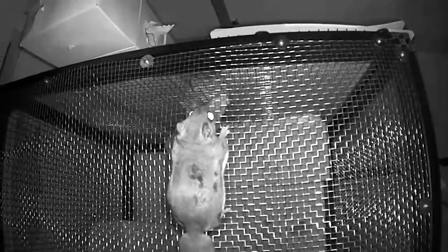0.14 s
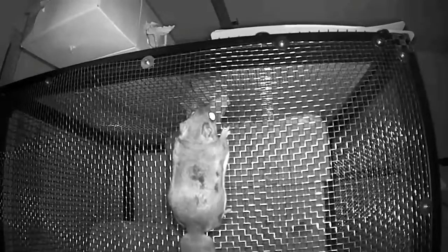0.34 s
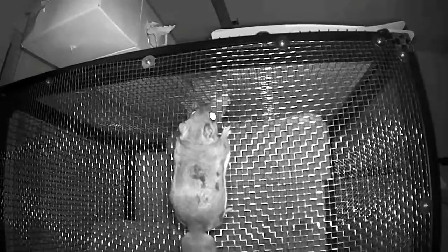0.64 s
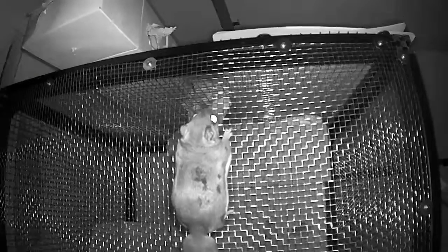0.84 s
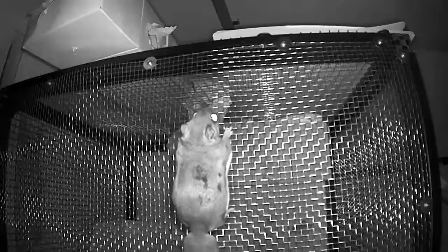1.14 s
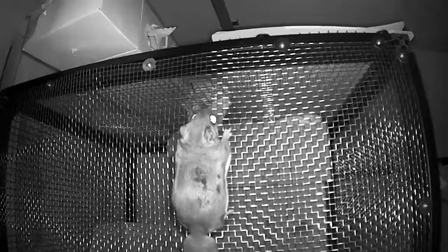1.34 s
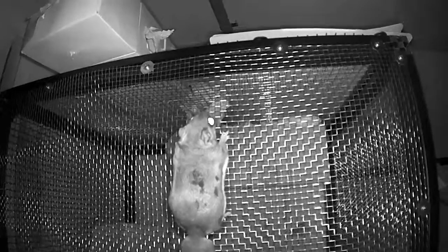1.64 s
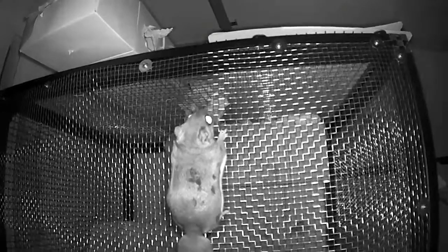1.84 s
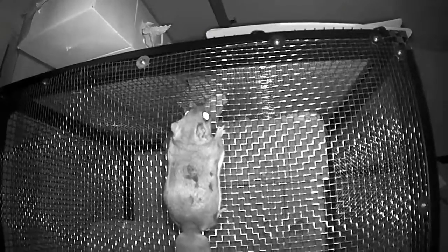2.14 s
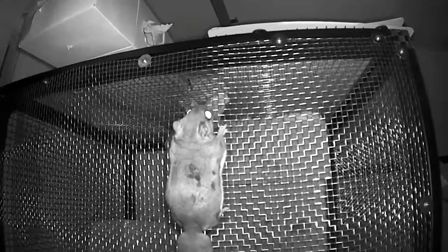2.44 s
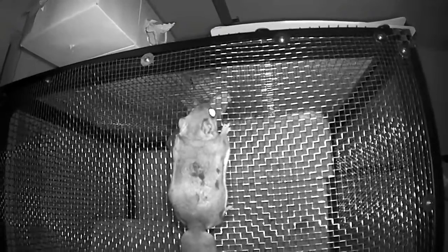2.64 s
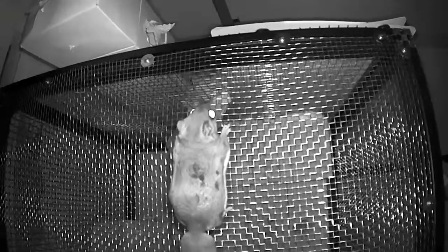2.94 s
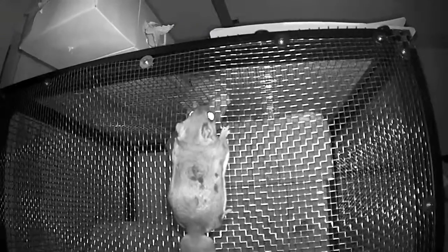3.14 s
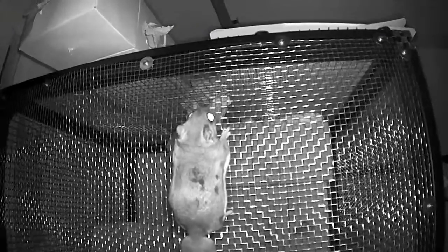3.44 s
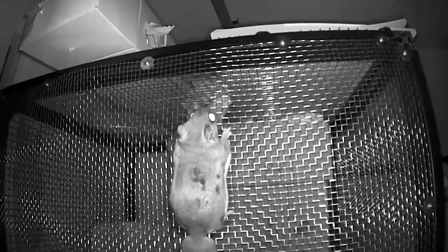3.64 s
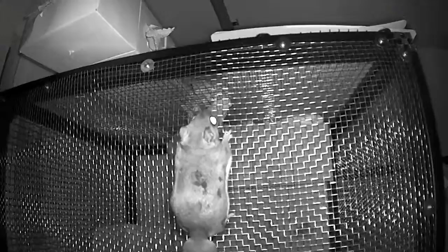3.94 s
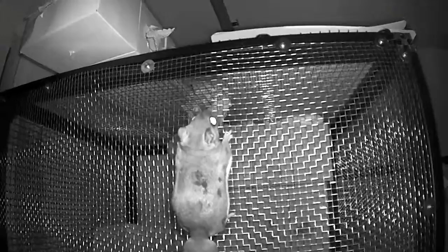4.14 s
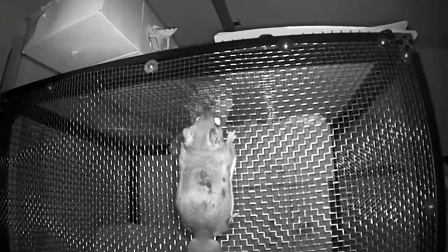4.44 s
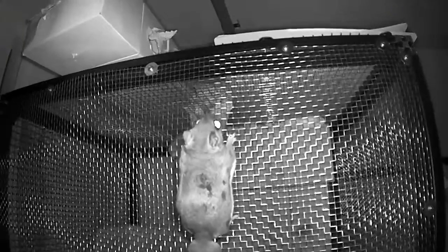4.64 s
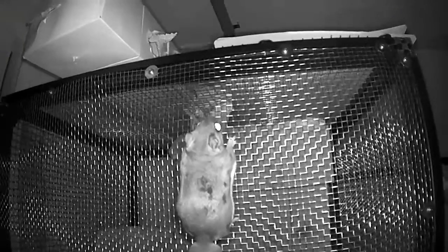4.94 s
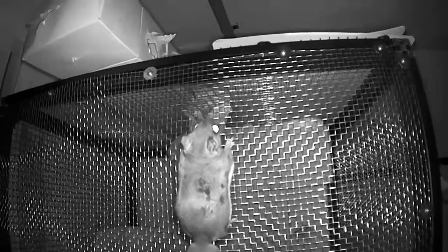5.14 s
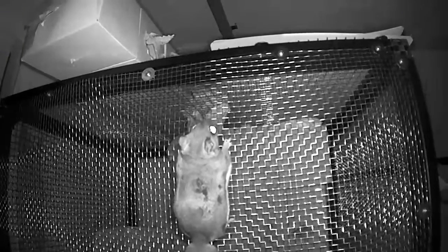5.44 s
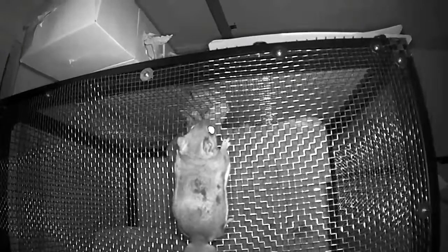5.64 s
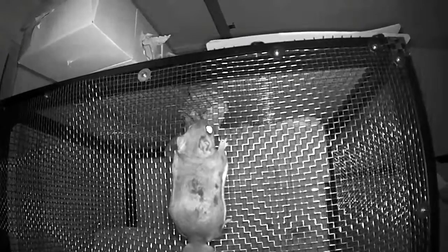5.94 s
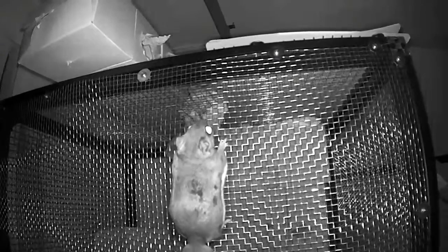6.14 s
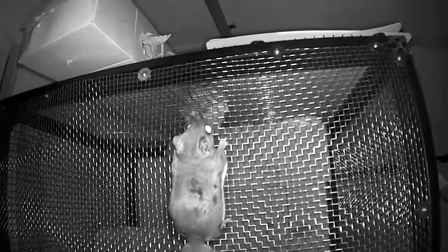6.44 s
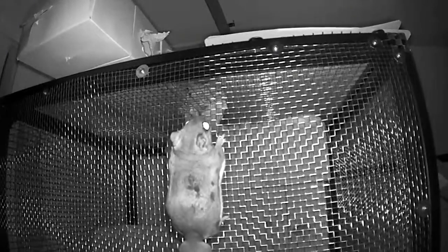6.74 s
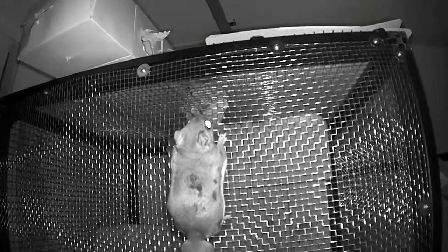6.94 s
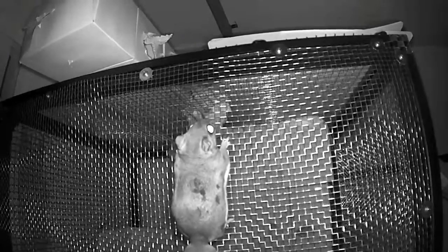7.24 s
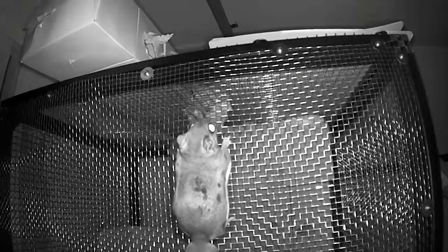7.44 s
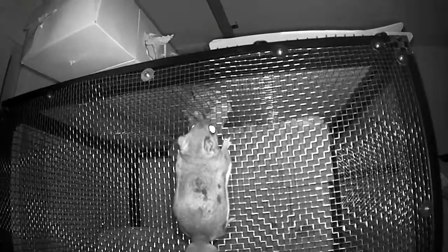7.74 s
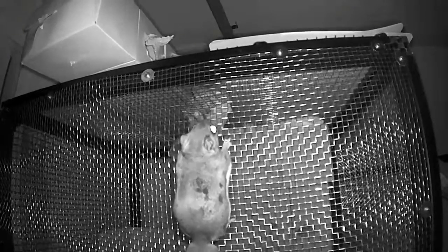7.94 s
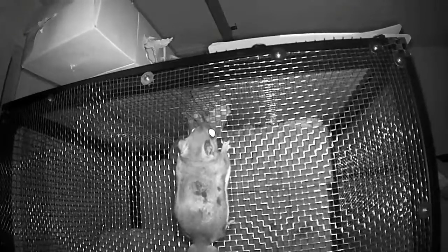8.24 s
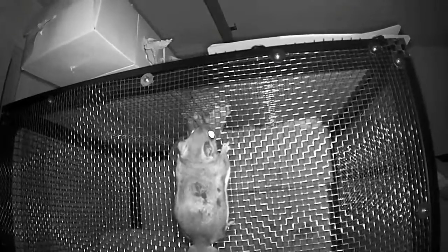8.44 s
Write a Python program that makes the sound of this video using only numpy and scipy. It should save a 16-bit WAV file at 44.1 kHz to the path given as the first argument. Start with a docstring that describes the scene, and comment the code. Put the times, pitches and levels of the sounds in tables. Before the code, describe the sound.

Eight piercing chirps from a caged squirrel, unevenly spaced around a second apart, each prepared by soft hiss and rasp and ending in a fast downward swoop with a brief room echo. Distant, blurred chirps answer faintly. Underneath lie low room rumble, airy noise, a thin whine and the camera's quiet stuttering buzz. Soft low thumps stir the cage twice. The microphone is close, the sound narrow and identical in both channels.

```python
"""Flying squirrel calling at night

A flying squirrel calls from a mesh cage in a quiet room, close to a small night camera. Each call is shaped
noise (a thin hiss), random grains and a sagging tone (a raspy wheeze), then a loud gliding sine: a whistle
that hangs near 8 kHz and plunges nearly two octaves. Faint calls of the same kind come from further off.
The camera's gated partials buzz once per frame, and damped sines make two soft disturbances of the cage."""
import sys
import numpy as np
from scipy import signal
from scipy.fft import rfft, irfft
from scipy.io import wavfile

SR = 44100
rng = np.random.default_rng(int(sys.argv[2]) if len(sys.argv) > 2 else 0)


def output_pcm(signal):
    """Save a mono or channel-first signal as 16-bit PCM at the path in sys.argv[1].

    Samples are clipped to [-1, 1] before scaling.
    """
    pcm = np.clip(np.atleast_2d(signal).T, -1, 1) * 32767
    wavfile.write(sys.argv[1], SR, np.round(pcm).astype(np.int16))


N = 378378
TIME = np.arange(N) / SR


def from_db(db):
    """Logarithmic level: decibels to amplitude gain."""
    return 10 ** (np.asarray(db) / 20)


def rms_one(x):
    """Normalization: scale to unit rms."""
    return x / np.sqrt(np.mean(x ** 2) + 1e-20)


def coloured(x, spectrum):
    """Spectral filtering: shape x by (pitch_hz, level_db) points on a log-frequency axis; unit rms."""
    hz, db = np.transpose(spectrum)
    bins_hz = np.fft.rfftfreq(len(x), 1 / SR) + 1  # the offset avoids log(0)
    gain = from_db(np.interp(np.log(bins_hz), np.log(hz), db))
    return rms_one(irfft(rfft(x) * gain, len(x)))


def noise(spectrum):
    """Stationary random noise: steady, with a given colour."""
    return coloured(rng.standard_normal(N), spectrum)


def drift(rate_hz):
    """Low-passed randomness: a smooth random curve of unit rms."""
    r = np.exp(-2 * np.pi * rate_hz / SR)
    return rms_one(signal.lfilter([1], [1, -2 * r, r * r], rng.standard_normal(N)))


def sine(hz):
    """Phase integration: a tone of unit rms follows a pitch curve."""
    return np.sqrt(2) * np.sin(2 * np.pi * np.cumsum(hz) / SR)


def envelope(s, attack, hold, release):
    """Exponential growth and decay: 20 dB per attack or release time; gives (span, time from s, dB)."""
    span = slice(*np.searchsorted(TIME, [s - 2 * attack, s + hold + 2 * release]))
    t = TIME[span] - s
    return span, t, -20 * np.maximum(np.maximum(-t / attack, (t - hold) / release), 0)


def puffs(events, attack, release):
    """Amplitude modulation: the gain of a row of (start_s, hold_s, level_db) puffs."""
    gain = np.zeros(N)
    for s, hold, db in events:
        span, t, fade = envelope(s, attack, hold, release)
        gain[span] += from_db(db + fade)
    return gain


# colour of the low room rumble: pitch_hz, level_db (relative)
RUMBLE_COLOUR = [(12, -8.5), (20, 2.5), (38, 0.5), (97, -12.5), (189, -19.5), (375, -24), (464, -26),
                 (600, -30), (780, -58), (1320, -120)]
# colour of the airy room noise: pitch_hz, level_db (relative)
AIR_COLOUR = [(300, -3), (600, -4), (1100, -2), (1900, 0.5), (2400, 4), (3000, -1), (4300, -2), (5500, -2),
              (6800, -1.5), (7600, 0.5), (8100, -6.5)]


def room_floor(rumble_db=-60, air_db=-65):
    """Incoherent superposition: low rumble and airy noise add in power."""
    return from_db(rumble_db) * noise(RUMBLE_COLOUR) + from_db(air_db) * noise(AIR_COLOUR)


# longer spells of camera buzz: centre_s, length_s, level_db
LONG_BUZZES = [(.885, 0.039, -57), (2.87, 0.053, -56.5), (4.87, 0.041, -56), (6.895, 0.034, -56)]
# inharmonic partials of the buzz: multiple of the base pitch, level_db, roughness (0-1)
BUZZ_PARTIALS = [(1, 0, 0.3), (1.76, -19, 0.3), (2.32, -26.5, 0.7), (2.8, -15, 0.5), (3.02, -11.5, 0.4),
                 (4.218, -17.5, 0.5)]
FRAME_RATE_HZ, FIRST_FRAME_S = 15.014, .0537


def camera(buzz_hz=818, buzz_db=-55, whine_hz=2462, whine_db=-76, scatter_s=0.0012):
    """Gated partials: the electronics buzz at every frame, a little differently each time, over a thin whine."""
    length_s, edge_s, wander = .013, .005, .03  # typical burst length, edge ramp, pitch spread as a fraction
    frames = np.arange(FIRST_FRAME_S, TIME[-1], 1 / FRAME_RATE_HZ)
    chance = rng.uniform(-1.2, 1, (len(frames), 3))
    bursts = [(s + scatter_s * a, length_s * (1 + 0.39 * b), buzz_db + 3 * c)
              for s, (a, b, c) in zip(frames, chance)]
    gate = np.zeros(N)
    for s, length, db in bursts + list(LONG_BUZZES):
        span = slice(*np.searchsorted(TIME, [s - length, s + length]))
        shape = np.clip((length / 2 - abs(TIME[span] - s)) / edge_s + .5, 0, 1)
        gate[span] = np.maximum(gate[span], from_db(db) * shape)
    pitch = buzz_hz * (1 + wander * drift(90))
    buzz = np.zeros(N)
    for multiple, db, rough in BUZZ_PARTIALS:
        partial = sine(multiple * pitch + 40 * drift(339))
        buzz += from_db(db) * partial * (1 + rough * drift(140))
    grit = from_db(-13.5) * noise([(300, -1), (2400, -6.5), (4000, 5), (8000, -4.0)])
    idle = from_db(-73) * noise([(450, -24.5), (660, -5), (780, -7), (900, -9.5), (1200, -30.5)])
    whine = from_db(whine_db) * sine(whine_hz * (1 + .001 * drift(60)))
    return gate * (buzz + grit) + idle + whine


# soft bumps on the cage: start_s, level_db, pitch_hz
BUMPS = [(1.392, -40, 150), (3.536, -34.5, 46), (3.585, -39, 79), (3.641, -45, 49)]


def bumps(t60=0.033, shuffle_db=-11, attack_s=0.015, release_s=0.052):
    """Damped oscillation: each bump swings the cage at a low pitch, with a dull shuffle around it."""
    swings, t = np.zeros(N), TIME[:SR // 4]
    for s, db, hz in BUMPS:
        at = round(s * SR)
        swings[at:at + len(t)] += from_db(db - 60 * t / t60) * np.sin(2 * np.pi * hz * t)
    shuffle = puffs([(s, 0, db + shuffle_db) for s, db, hz in BUMPS], attack_s, release_s)
    return swings + shuffle * noise([(25, -4), (90, 3), (220, -12.5), (400, -23.0), (1500, -53)])


# colour of the dense reverberation: pitch_hz, level_db (relative)
REVERB_COLOUR = [(500, -2), (2000, -3), (3000, 3), (4300, -3.5), (5500, 1.5), (6600, -7), (7400, -2),
                 (8200, -11.5)]
# ringing modes of the space around the cage: pitch_hz, level_db (relative)
SPACE_MODES = [(4066, -3), (4326, 0), (4630, -14), (4792, -14.5), (6647, -4), (7298, 2.5), (7386, -8.5),
               (7593, -1.5), (7790, -6), (7939, -4.5)]


def reverberate(x, t60, build_s, modes_db=-13):
    """Convolution: dense reflections and a few stronger modes build up and die away; unit energy."""
    t = TIME[:SR // 2]
    modes = sum(from_db(db) * np.sin(2 * np.pi * (hz * t + rng.random())) for hz, db in SPACE_MODES)
    response = coloured(rng.standard_normal(len(t)), REVERB_COLOUR) + from_db(modes_db) * modes
    response = response * from_db(-60 * t / t60) * np.minimum(t / build_s, 1) ** 2
    return signal.fftconvolve(x, response / np.linalg.norm(response))[:N]


# reflections from nearby surfaces: delay_s, level_db (relative to the direct sound)
ECHOES = [(.0021, -12), (.0045, -7), (.0112, -14), (.0138, -12)]


def echoes(x):
    """Interference: single delayed reflections cross the gliding whistle and make it beat."""
    return sum(from_db(db) * np.interp(TIME - delay, TIME, x, left=0) for delay, db in ECHOES)


# the whistle's pitch: held, lifted to a crest just before the peak, then rolled over to a break
HOLD_HZ, CREST_HZ, BREAK_HZ = 7604, 8042, 6797
CREST_LEAD_S, LIFT_S = 0.0021, .007
# after the break it drops at once, then falls evenly, never below its lowest note
DROP_HZ, DROP_S, FALL_HZ_PER_S, LOWEST_HZ = 1870, .003, 122400, 1832
# its level swells out of the hold, sags over the shoulder, breaks and is released
SWELL_DB, SWELL_S, SAG_DB = 17.5, 0.0079, 11.5
BREAK_S, ONSET_S, RELEASE_S = .003, .003, 0.0052
# resonances that the plunge passes: pitch_hz, level_db (relative to the plunge level)
PLUNGE_COLOUR = [(1900, -10), (2200, -6.5), (2600, -19), (3100, -20.5), (3850, -6), (4400, 0),
                 (5500, -10.5), (6700, -0.5)]


def chirp(s, hold, shoulder, plunge, peak_db, plunge_db):
    """Frequency glide: the whistle holds, lifts as it swells, rolls over and plunges lower the longer it lasts."""
    span, t, fade = envelope(s - hold, ONSET_S, hold + shoulder + plunge, RELEASE_S)
    t = t - hold  # time from the loudest moment
    crest, fallen = t + CREST_LEAD_S, np.maximum(t - shoulder, 0)
    lift = (CREST_HZ - HOLD_HZ) * np.exp(np.minimum(crest, 0) / LIFT_S)
    roll = (CREST_HZ - BREAK_HZ) * np.clip(crest / (shoulder + CREST_LEAD_S), 0, 1)
    drop = DROP_HZ * (1 - np.exp(-fallen / DROP_S))
    hz = np.maximum(HOLD_HZ + lift - roll - drop - FALL_HZ_PER_S * fallen, LOWEST_HZ)
    swell = SWELL_DB * (1 - np.exp(np.minimum(t, 0) / SWELL_S))
    sag = SAG_DB * np.sqrt(np.clip(t / shoulder, 0, 1))
    high_db = peak_db - swell - sag
    low_db = plunge_db + np.interp(hz, *np.transpose(PLUNGE_COLOUR))
    broken = np.minimum(fallen / BREAK_S, 1)
    return span, hz, fade + (1 - broken) * high_db + broken * low_db


# the wheeze sags towards a resting pitch
WHEEZE_REST_HZ, WHEEZE_ABOVE_HZ, WHEEZE_SAG_S = 4323, 430, .03
WHEEZE_ATTACK_S, WHEEZE_RELEASE_S = 0.019, .028


def wheeze(s, db):
    """Exponential relaxation: a soft whistle sags from above 5 kHz towards its resting pitch."""
    span, t, fade = envelope(s, WHEEZE_ATTACK_S, 0, WHEEZE_RELEASE_S)
    return span, WHEEZE_REST_HZ + WHEEZE_ABOVE_HZ * np.exp(-t / WHEEZE_SAG_S), db + fade


def add(out, whistle, waver):
    """Frequency modulation: add a whistle (span, Hz, dB) whose pitch wavers by a fraction."""
    span, hz, db = whistle
    out[span] += from_db(db) * sine(hz * (1 + waver[span]))


FAR_HOLD_S, FAR_SHOULDER_S, FAR_PLUNGE_S = 0.034, 0.012, .013
# a pip and a wheeze announce each far call: lead times, and levels against its peak
PIP_LEAD_S, FAR_WHEEZE_LEAD_S = .228, .056
PIP_DB, FAR_WHEEZE_DB = -10, -15.5
# distant calls, before the loss on the way: peak_s, peak_db, plunge_db
FAR_CALLS = [(0.106, -47, -70), (1.167, -45, -73), (2.248, -42, -56), (3.338, -44.5, -56),
             (3.811, -64, -51.5), (4.637, -45, -53), (5.595, -49, -50.5), (6.858, -46, -54),
             (7.945, -48, -46)]


def far_squirrel(jitter=0.027):
    """Source similarity: a soft pip, then the same wheeze and chirp, much weaker."""
    voice, waver = np.zeros(N), jitter * drift(700)
    for s, peak_db, plunge_db in FAR_CALLS:
        pip_levels = peak_db + PIP_DB, plunge_db + PIP_DB
        add(voice, chirp(s - PIP_LEAD_S, FAR_HOLD_S, FAR_SHOULDER_S, 0, *pip_levels), waver)
        add(voice, wheeze(s - FAR_WHEEZE_LEAD_S, peak_db + FAR_WHEEZE_DB), waver)
        add(voice, chirp(s, FAR_HOLD_S, FAR_SHOULDER_S, FAR_PLUNGE_S, peak_db, plunge_db), waver)
    return voice


HISS_DB, HISS_ATTACK_S, HISS_RELEASE_S = -56, .028, 0.079
BUILD_DB, BUILD_S = -49, 0.17
# colour of the opening hiss: pitch_hz, level_db (relative)
HISS_COLOUR = [(300, -21), (1600, -21.5), (2200, -5.5), (2900, -16), (4400, -8), (5600, -10.5), (6600, -1),
               (8000, -2.5)]


def hiss(events, flutter_db=5.5):
    """Turbulence noise: air hisses through the narrow throat and builds as the wheeze nears."""
    steady = puffs(events, HISS_ATTACK_S, HISS_RELEASE_S)
    build = puffs([(s + length, 0, BUILD_DB) for s, length, db in events], BUILD_S, HISS_RELEASE_S)
    return np.hypot(steady, build) * noise(HISS_COLOUR) * from_db(flutter_db * drift(45))


AIRY_HZ, AIRY_SINK_HZ_PER_S, AIRY_DB = 7440, 13000, -61.5


def airy_tone(s, length):
    """Linear glide: a tone inside the hiss, blurred by its pitch waver, sinks towards the wheeze."""
    span, t, fade = envelope(s, HISS_ATTACK_S, length, HISS_ATTACK_S)
    return span, AIRY_HZ - AIRY_SINK_HZ_PER_S * t, AIRY_DB + fade


RASP_ATTACK_S, RASP_HOLD_S, RASP_RELEASE_S, FLUTTER_DB = .026, .016, .045, -65
# colour of the rasp: pitch_hz, level_db (relative)
RASP_COLOUR = [(150, -13), (600, -21.5), (1400, -24.5), (2200, -30), (3200, -23.5), (4700, -14),
               (6200, -13), (7400, 1.5), (8200, -8.5)]
# colour of the low flutter under the rasp: pitch_hz, level_db (relative)
FLUTTER_COLOUR = [(60, -10.5), (200, 5), (450, -10), (1000, -4), (2000, -2), (3200, -10)]


def rasp_and_flutter(events, crackles_per_s=300, breath_share=0.19):
    """Random impulse excitation: crackles of rising pressure ride on the wheeze as rasp and low flutter."""
    grains = (rng.random(N) < crackles_per_s / SR) * rng.uniform(0.097, 1, N)
    grains = grains - grains.mean()
    rasp = rms_one(coloured(grains, RASP_COLOUR) + breath_share * noise(RASP_COLOUR))
    flutter = coloured(grains, FLUTTER_COLOUR)
    flutters = [(s, hold, FLUTTER_DB) for s, hold, db in events]
    shape = RASP_ATTACK_S, RASP_RELEASE_S
    return puffs(events, *shape) * rasp + puffs(flutters, *shape) * flutter


CATCH_ATTACK_S, CATCH_RELEASE_S, ONSET_CATCH_DB = .003, 0.0033, -24.5
# extra sharp catches of the voice: one strengthens the first whistle's start, the others fall within
# wheezes: start_s, level_db
EXTRA_CATCHES = [(0.4413, -20.5), (.454, -23), (2.71, -19.5), (2.738, -22), (5.06, -21.5)]
# bright colour of a catch: pitch_hz, level_db (relative)
CATCH_COLOUR = [(200, -35), (3000, -23), (5000, -26.5), (5800, -9.5), (7200, -1.5), (8200, 3.5)]


def voice_catches(onsets):
    """Transient noise: a bright burst starts every whistle, and a few extra ones sharpen some calls."""
    events = [(s, 0, db) for s, db in EXTRA_CATCHES] + [(s, 0, ONSET_CATCH_DB) for s in onsets]
    return puffs(events, CATCH_ATTACK_S, CATCH_RELEASE_S) * noise(CATCH_COLOUR)


# near calls: peak_s, hiss_length_s, wheeze_lead_s, hold_s, shoulder_s, plunge_s,
# peak_db, plunge_db, wheeze_db, rasp_db
NEAR_CALLS = [(0.5098, .155, 0.086, .055, 0.0037, 0.02, -17, -37.5, -42.5, -41.5),
              (1.802, 0.18, 0.052, 0.015, 0.0049, 0.022, -17, -32, -39.5, -38.5),
              (2.766, 0.16, 0.07, 0.0089, 0.0032, 0.024, -20, -30.5, -42, -45.5),
              (4.034, 0.16, .053, 0.029, 0.01, 0.022, -16, -35, -40.5, -39),
              (5.106, 0.18, 0.076, 0.01, 0.0049, 0.023, -17, -32, -42.5, -42.5),
              (6.155, .16, 0.056, 0.018, .0131, 0.023, -18, -29.5, -44, -38.5),
              (7.018, .133, 0.059, 0.014, 0.017, 0.025, -17, -32.5, -44.5, -41),
              (8.146, .165, .049, 0.023, 0.0069, .018, -18, -34, -46.5, -46)]


def near_squirrel(jitter=0.0099, wheeze_jitter=.009, flutter_db=3.0, airy_jitter=0.095):
    """Source superposition: throat hiss, crackling wheeze and whistle overlap in each call."""
    voice, hisses, rasps, onsets = np.zeros(N), [], [], []
    steady, rough, airy = jitter * drift(400), wheeze_jitter * drift(310), airy_jitter * drift(1500)
    for s, hiss_s, lead, hold, shoulder, plunge, peak_db, plunge_db, wheeze_db, rasp_db in NEAR_CALLS:
        wheeze_at = s - lead
        hiss_at = wheeze_at - hiss_s
        add(voice, airy_tone(hiss_at, hiss_s), airy)
        add(voice, wheeze(wheeze_at, wheeze_db), rough)
        add(voice, chirp(s, hold, shoulder, plunge, peak_db, plunge_db), steady)
        hisses.append((hiss_at, hiss_s, HISS_DB))
        rasps.append((wheeze_at, RASP_HOLD_S, rasp_db))
        onsets.append(s - hold)
    voice = voice * from_db(flutter_db * drift(160))
    return voice + hiss(hisses) + rasp_and_flutter(rasps) + voice_catches(onsets)


def scene(room_db=-10, far_db=-3, far_direct_db=-6):
    """Linear superposition: all sounds meet at one microphone, which feeds both channels."""
    near_dry, far_dry = near_squirrel(), far_squirrel()
    near_room = from_db(room_db) * reverberate(near_dry, t60=0.17, build_s=0.011)
    near = near_dry + echoes(near_dry) + near_room
    far_room = from_db(far_db) * reverberate(far_dry, t60=0.3, build_s=0.0051)
    far = from_db(far_direct_db) * far_dry + far_room
    return np.tile(near + far + bumps() + camera() + room_floor(), (2, 1))


def record(dry, cutoff_hz=8120):
    """Band limitation: the small recorder passes nothing much above 8 kHz."""
    taps = signal.firwin(301, cutoff_hz, window=("kaiser", 5), fs=SR)
    return signal.fftconvolve(dry, taps[None], mode="same", axes=1)


dry = scene()
out = record(dry)
output_pcm(out)
```